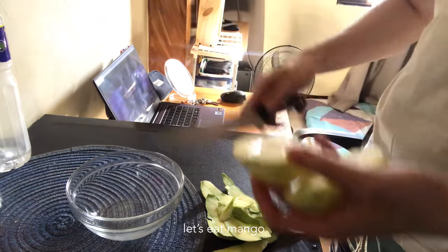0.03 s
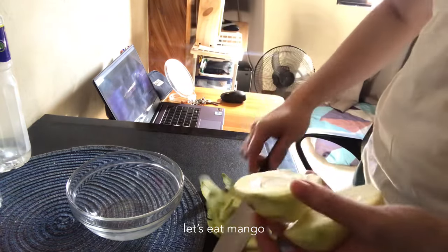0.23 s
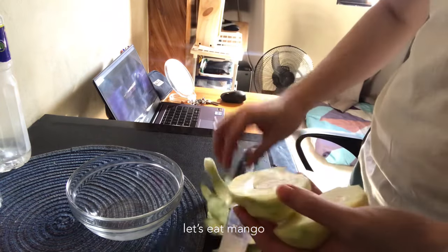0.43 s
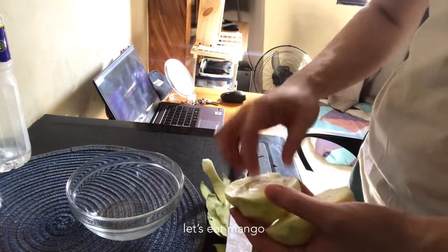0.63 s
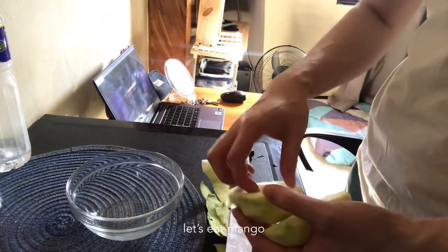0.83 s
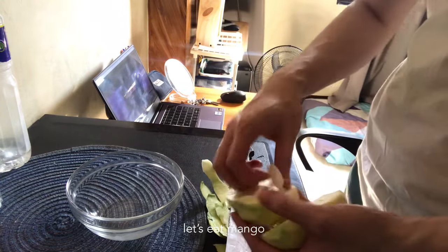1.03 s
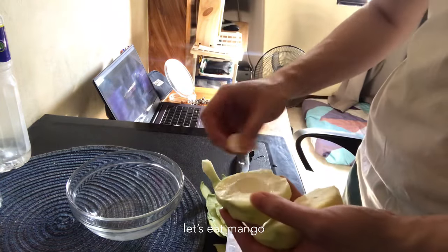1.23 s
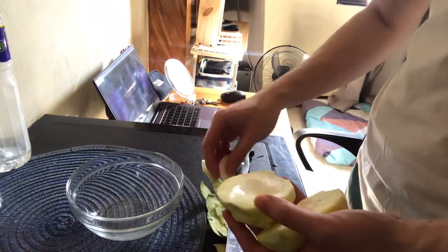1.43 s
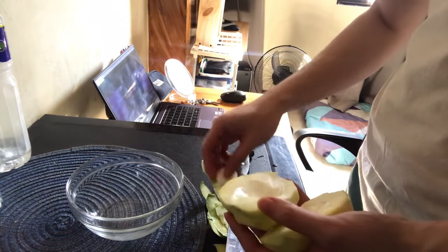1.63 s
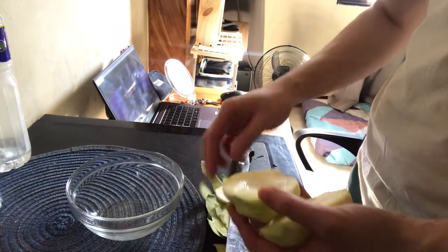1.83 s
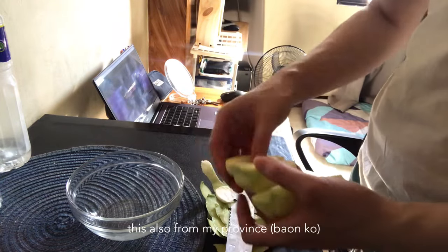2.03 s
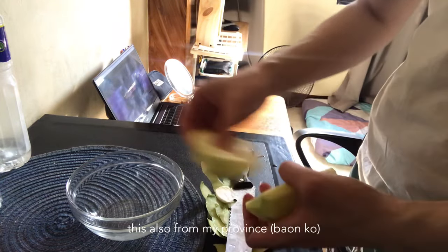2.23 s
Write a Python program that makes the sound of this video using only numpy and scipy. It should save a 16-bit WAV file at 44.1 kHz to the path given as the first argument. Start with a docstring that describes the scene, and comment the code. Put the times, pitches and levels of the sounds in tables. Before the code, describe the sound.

A knife knocks sharply down on a hard table over a humming electric fan.

```python
"""A kitchen knife is put down on a hard table: the handle knocks, the blade slaps, and it bounces once.
Each hit layers a woody thud from the table, a ringing clack from the knife and a bright steel tick,
with a short tail from the small room. An electric fan hums and whirs underneath throughout.
Just before it lands, the blade gives a faint high scrape; afterwards fingers pick at moist cut fruit
and a slice slides off with a slight squeak."""
import sys
import numpy as np
from scipy import signal
from scipy.fft import rfft, irfft
from scipy.io import wavfile

SR = 44100
rng = np.random.default_rng(int(sys.argv[2]) if len(sys.argv) > 2 else 0)


def transcribe(signal):
    """Save signal, clipped to [-1, 1], as a 16-bit WAV file at the path in sys.argv[1]."""
    frames = np.atleast_2d(signal).T
    limited = np.clip(frames, -1, 1)
    pcm = np.round(limited * 32767).astype(np.int16)
    wavfile.write(sys.argv[1], SR, pcm)


N = 101429
T = np.arange(N) / SR

# The swell and sink of the fan's deep hum. Each row: time in seconds, level in dB before the trim.
HUM_FADER = [(0.0, -37.5), (0.06, -64), (0.2, -52), (0.26, -34), (0.53, -58), (0.61, -35.5), (0.74, -45.5),
             (0.8, -36.5), (1.05, -48), (1.13, -36), (1.22, -40.5), (1.42, -33.5), (1.58, -42.5),
             (1.78, -40), (1.91, -47.5), (1.99, -39.5), (2.25, -45), (2.3, -38)]
# The fan's low-end throb. Each row: centre in Hz, width in Hz, rms level in dB.
THROB_BANDS = [(54.7, 5.5, -49.5), (83.5, 15.5, -48), (115.4, 12, -52), (206.8, 12, -61)]
# The whir of fan blades and motor. Each row: pitch in Hz, rms level in dB, waver relative to the tone.
WHIR_TONES = [(238.5, -46, 0.072), (343.1, -58.5, 0.22), (360.7, -60, 0.25), (801, -64.5, 0.65),
              (1025, -70, 0.41), (1404, -70.5, 0.48), (1654, -69, 0.85), (1827, -72.5, 0.31),
              (1882, -73.5, 0.35), (1975, -74.5, 0.48), (2040, -77.5, 0.47), (2102, -71.5, 0.98),
              (3300, -76, 0.39), (3300, -90, 0.65), (7000, -83.5, 0.89)]
# The colour of the rushing air. Each row: frequency in Hz, relative level in dB.
AIR_EQ = [(20, -25), (35, -9), (55, 6), (110, 9.5), (145, -2), (240, 0.5), (310, -8), (480, -10),
          (950, -11.5), (1300, -16.5), (2100, -21), (2500, -24.5), (3400, -25), (5000, -32), (7000, -34.5),
          (7700, -39), (9300, -36), (10400, -40.5), (14000, -38.5), (16000, -46)]
# The thin whistle of the scraping blade. Each row: centre in Hz, width in Hz, level in dB.
SCRAPE_BANDS = [(5500, 130, -57), (6440, 250, -72), (10500, 300, -72)]
# The knife's hits on the table. Each row: start in seconds, then thud, clack and tick gains in dB.
HITS = [(.3390, -27, -12.5, -22.5), (.3540, -19.5, -24.5, -21), (0.3557, -30, -33, -26),
        (0.4145, -20, -44, -29)]
# The body of the table top. Each row: pitch in Hz, relative level in dB, 60 dB decay time in seconds.
TABLE_RING = [(276.6, -5.5, 0.21), (352, -11.5, 0.28), (394, -0.5, 0.17), (472, -18, 0.3),
              (516, -17.5, 0.22), (595, -22.5, 0.22), (631, -16, 0.19), (900, -19, 0.097),
              (1025, -13.5, 0.13)]
# The table's many weaker modes, blurred to a dull knock. Each row: frequency in Hz, relative level in dB.
KNOCK_EQ = [(120, -41), (240, 6), (330, 7), (470, 5), (680, -0.5), (1000, 0.5), (1400, -15), (1900, -13.5),
            (4000, -32), (16000, -35)]
# Handle and blade ringing as one. Each row: pitch in Hz, relative level in dB, 60 dB decay in seconds.
KNIFE_RING = [(729, -20, 0.25), (784, -10.5, 0.1), (1045, -19.5, 0.22), (1136, -17.5, 0.14),
              (1167, -21, 0.25), (1213, -14, 0.041), (1344, -19.5, 0.36), (1391.5, -18, 0.25),
              (1485, -38, 0.071), (2000, -22, 0.18), (2370, -22.5, 0.12), (2545, -16.5, 0.058),
              (2612, -27.5, 0.17)]
# The handle's dry attack. Each row: pitch in Hz, relative level in dB, 60 dB decay in seconds.
HANDLE_CRACK = [(772, -5.5, 0.048), (1196, 3.5, .013), (2370, 0, 0.0081), (3220, -6.5, 0.0076),
                (4370, -10, 0.0094)]
# The colour of the bright steel tick. Each row: frequency in Hz, relative level in dB.
TICK_EQ = [(300, -30), (1500, 3), (2600, 8), (4000, 3.5), (5800, 0), (8300, -0.5), (10300, -6.5),
           (13500, 0), (16000, -8)]
# The thin blade's own ring. Each row: pitch in Hz, relative level in dB, 60 dB decay in seconds.
BLADE_RING = [(3370, -35, .09), (3720, -16.5, 0.058), (4400, -23, 0.045), (5346, -22, 0.056),
              (6767, -30.5, 0.15), (8240, -23.5, .05), (13540, -19, .03)]
# The small room's reverb. Each row: frequency in Hz, gain in dB, 60 dB decay in seconds.
REVERB_BANDS = [(150, -18, 0.25), (398, -16.5, 0.23), (1180, -4, 0.27), (3000, -9.5, 0.18),
                (7000, -13, 0.42), (16000, -9, .28)]
# Fingertips on moist fruit. Each row: peak time in seconds, level in dB, rise and fall in seconds.
FINGER_TAPS = [(.634, -60, .001, .005), (0.645, -62, 0.0051, 0.0073), (.807, -58.5, .001, .004),
               (.898, -67, .001, .004), (2.06, -67, 0.014, .012)]
# The colour of those touches. Each row: frequency in Hz, relative level in dB.
TOUCH_EQ = [(1500, -9), (4000, 5), (7000, 4), (12000, 3), (16000, -1)]
# The colour of the sliding slice. Each row: frequency in Hz, relative level in dB.
SLIDE_EQ = [(200, -5), (1000, 6), (2500, -2), (4500, -6.5), (8000, -15), (16000, -24)]


def from_db(db):
    """Decibels to gain."""
    return 10 ** (np.asarray(db) / 20)


def at_hz(points, hz, column=1):
    """Read a column of a table on a log-frequency axis."""
    table = np.array(points)
    return np.interp(np.log(np.maximum(hz, 1)), np.log(table[:, 0]), table[:, column])


def noise(eq, grain_db=0):
    """Noise coloured by an EQ curve, rms 1; grain makes it crackle."""
    grains = rng.standard_normal(N) * from_db(grain_db * np.clip(rng.standard_normal(N), -2, 2))
    freqs = np.arange(N // 2 + 1) * SR / N
    return rms_one(irfft(rfft(grains) * from_db(at_hz(eq, freqs)), N))


def narrow_noise(hz, width_hz):
    """Noise focused around one pitch, rms 1."""
    freqs = np.arange(N // 2 + 1) * SR / N
    resonance = 1 / (1 + (2 * (freqs - hz) / width_hz) ** 2)
    return rms_one(irfft(rfft(rng.standard_normal(N)) * resonance, N))


def rms_one(x):
    """Scale to rms 1."""
    return x / np.sqrt(np.mean(x ** 2) + 1e-20)


def decay(start_s, t60_s):
    """An envelope that jumps to 1, then falls 60 dB in t60_s."""
    return (T >= start_s) * np.exp(-np.log(1000) * np.maximum(T - start_s, 0) / t60_s)


def swell(peak_s, rise_s, fall_s):
    """An envelope that rises exponentially to 1, then falls away."""
    return np.exp(-np.maximum((peak_s - T) / rise_s, (T - peak_s) / fall_s))


def wavering(hz, waver):
    """A tone made slowly unsteady by a sliver of noise at its own pitch, rms 1."""
    tone = np.sqrt(2) * np.sin(2 * np.pi * (hz * T + rng.random()))
    return rms_one(tone + waver * narrow_noise(hz, width_hz=5.5))


def fan():
    """The bed: a deep swelling hum, a low throb and the whir of blades and motor over rushing air."""
    trim_db, air_db = 0.5, -46.5
    hum_db = np.interp(T, *np.transpose(HUM_FADER)) + trim_db
    hum = from_db(hum_db) * wavering(hz=56.6, waver=0.19)
    throb = sum(from_db(db) * narrow_noise(hz, width) for hz, width, db in THROB_BANDS)
    whir = sum(from_db(db) * wavering(hz, waver) for hz, db, waver in WHIR_TONES)
    return hum + throb + whir + from_db(air_db) * noise(AIR_EQ)


def blade_scrape():
    """Light friction makes the blade sing for a moment as it is lowered."""
    whistle = sum(from_db(db) * narrow_noise(hz, width) for hz, width, db in SCRAPE_BANDS)
    return swell(peak_s=0.275, rise_s=0.02, fall_s=0.0057) * whistle


def struck(modes, start_s):
    """A hit sets decaying sine modes ringing, in alternating polarity."""
    return sum((-1) ** k * from_db(db) * decay(start_s, t60) * np.sin(2 * np.pi * hz * (T - start_s))
               for k, (hz, db, t60) in enumerate(modes))


def knife_hits():
    """Each hit rings the table, handle and blade, topped by a gritty steel tick with a short shimmer."""
    rest_s = 0.365  # lying flat chokes the knife's ring
    choke = (T < rest_s) + decay(rest_s, t60_s=0.13)
    hits = np.zeros(N)
    for start, thud_db, clack_db, tick_db in HITS:
        knock = from_db(-8.5) * noise(KNOCK_EQ) * decay(start, t60_s=0.15)
        thud = struck(TABLE_RING, start) + knock
        clack = choke * struck(KNIFE_RING, start) + struck(HANDLE_CRACK, start)
        snap = decay(start, t60_s=0.0059)
        shimmer = from_db(-11.5) * decay(start, t60_s=0.07)
        grit = noise(TICK_EQ, grain_db=2.2)  # tiny impacts within the tick
        tick = grit * (snap + shimmer) + struck(BLADE_RING, start)
        hits += from_db(thud_db) * thud + from_db(clack_db) * clack + from_db(tick_db) * tick
    low_cut_hz = 218  # the hits carry little below this
    return signal.sosfilt(signal.butter(4, low_cut_hz, "high", fs=SR, output="sos"), hits)


def room_reverb(x):
    """The small room's diffuse tail, dying at its own rate in each octave."""
    predelay_s, edges_hz = 0.0033, np.geomspace(125, 16000, 8)
    impulse = np.zeros(N)
    for low, high in zip(edges_hz, edges_hz[1:]):
        centre_hz = np.sqrt(low * high)
        octave = signal.butter(2, [low, high], "band", fs=SR, output="sos")
        tail = signal.sosfilt(octave, rng.standard_normal(N))
        tail *= decay(predelay_s, at_hz(REVERB_BANDS, centre_hz, column=2))
        tail *= np.sqrt(2 * (high - low) / SR / np.sum(tail ** 2))  # about unity gain in this octave
        impulse += from_db(at_hz(REVERB_BANDS, centre_hz)) * tail
    return signal.fftconvolve(x, impulse)[:N]


def fingers_on_fruit():
    """Fingertips make small moist ticks and a faint rub, then a slice slides off with a squeak."""
    taps = sum(from_db(db) * swell(peak, rise, fall) for peak, db, rise, fall in FINGER_TAPS)
    rub = from_db(-68.5) * swell(peak_s=0.68, rise_s=0.16, fall_s=0.23)
    touches = (taps + rub) * noise(TOUCH_EQ, grain_db=7)
    squeak = from_db(-15) * narrow_noise(hz=4420, width_hz=210)
    slide = from_db(-52) * swell(peak_s=2.27, rise_s=0.023, fall_s=0.053)
    return touches + slide * (noise(SLIDE_EQ) + squeak)


def scene():
    """The mono mix: knife up front, fan and quiet handling behind. Only the hits feed the reverb."""
    hits = knife_hits()
    return (fan() + blade_scrape() + hits + room_reverb(hits) + fingers_on_fruit())[None]


def record(dry):
    """A steep high cut takes the very top off the mix."""
    high_cut_hz = 15800
    return signal.sosfilt(signal.ellip(10, .2, 80, high_cut_hz, fs=SR, output="sos"), dry)


dry = scene()
out = record(dry)
transcribe(out)
```